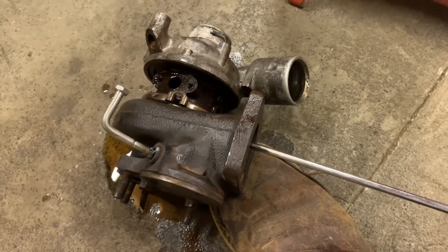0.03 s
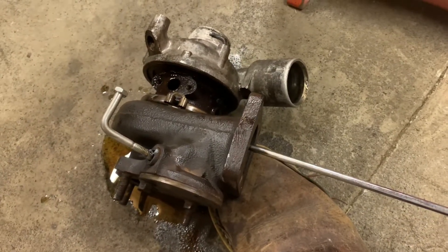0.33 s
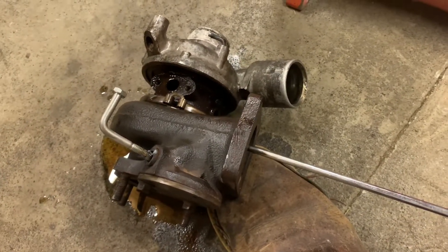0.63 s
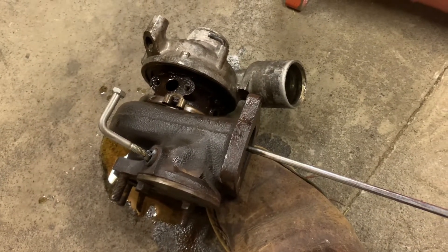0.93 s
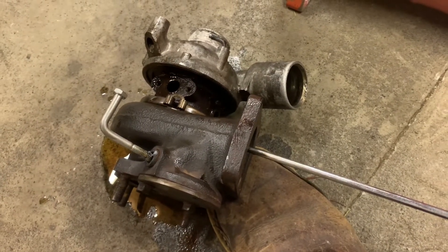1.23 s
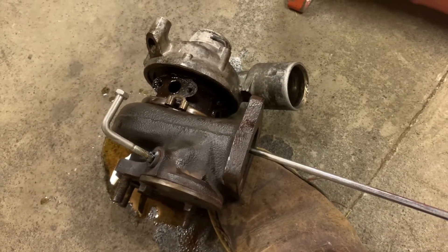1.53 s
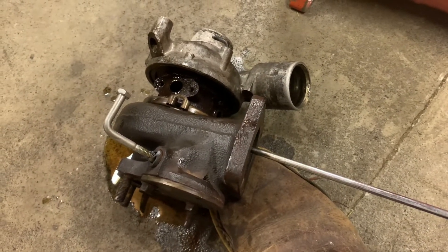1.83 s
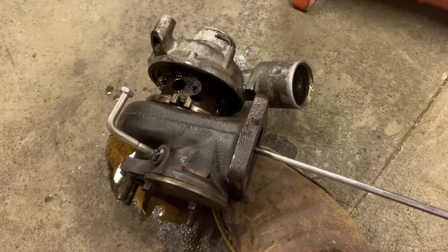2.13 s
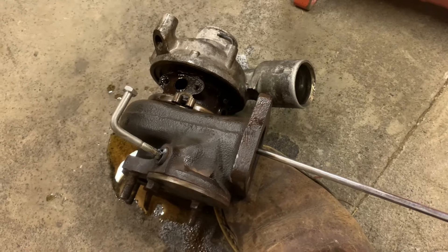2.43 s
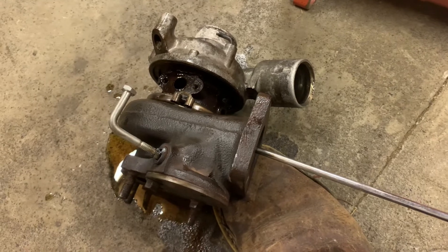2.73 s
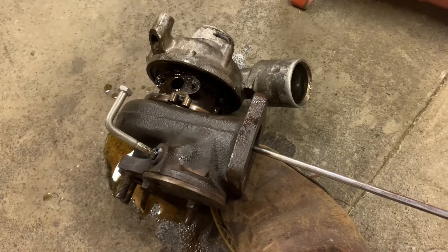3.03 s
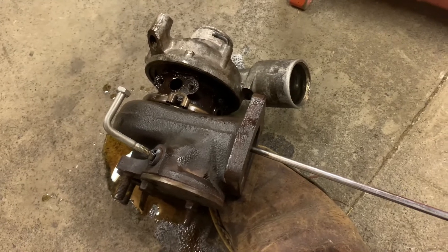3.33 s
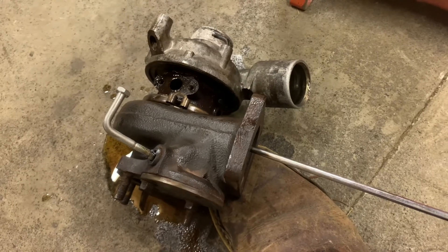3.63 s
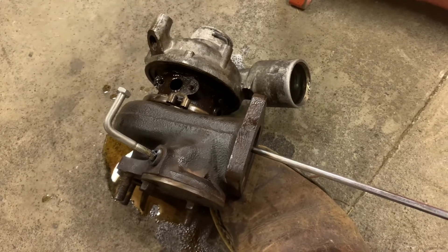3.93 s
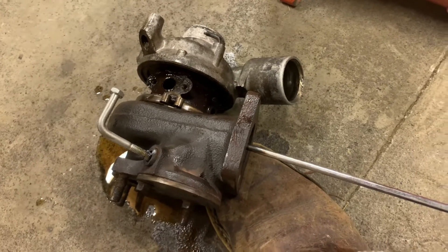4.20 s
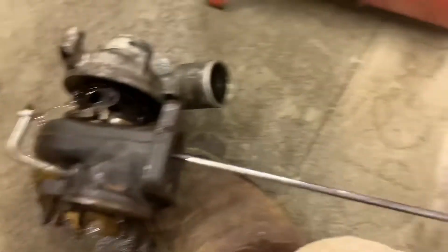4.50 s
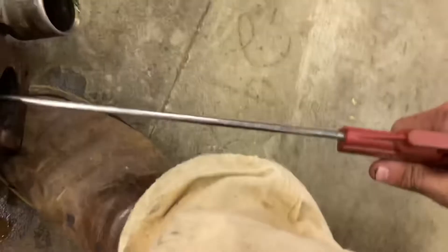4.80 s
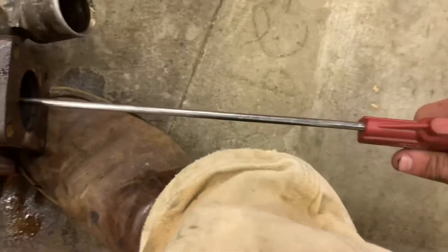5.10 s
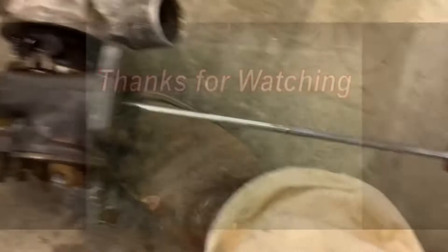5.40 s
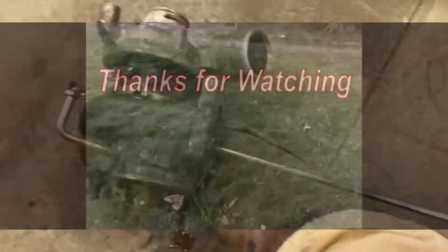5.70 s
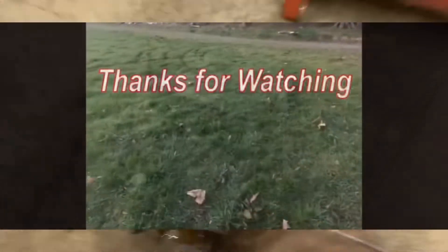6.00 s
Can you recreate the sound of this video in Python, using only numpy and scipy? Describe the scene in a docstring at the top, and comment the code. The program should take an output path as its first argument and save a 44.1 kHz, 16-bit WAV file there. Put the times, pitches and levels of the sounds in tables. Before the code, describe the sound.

A turbocharger whines upward under four hissing blasts from a blow gun, before the workshop gives way to a small puttering engine.

```python
"""A loose turbocharger on a workshop floor whistles as a blow gun spins it up in four blasts.
Its blades chop the jet like a siren; the rising tone swells and dips through the peaks of housing and
room together. Between blasts the wheel coasts. Turbulence hisses at the nozzle and an air pump thumps.
The listener steps closer before the last blast. At the end the workshop fades, and a small
two-cylinder engine, running outdoors, fades in, its firing pulses ringing a silencer."""
import sys
import numpy as np
from scipy import signal
from scipy.fft import rfft, irfft, next_fast_len
from scipy.io import wavfile
from scipy.ndimage import uniform_filter1d

SR = 44100
rng = np.random.default_rng(int(sys.argv[2]) if len(sys.argv) > 2 else 0)


def int16_out(signal):
    """Quantize to a 16-bit WAV file."""
    q = np.round(np.clip(np.atleast_2d(signal).T, -1, 1) * 32767)
    wavfile.write(sys.argv[1], SR, q.astype(np.int16))


N = 271215
TIME = np.arange(N) / SR
SIZE = next_fast_len(N + 2 * SR)
FREQ = np.arange(SIZE // 2 + 1) * SR / SIZE
BLADES = 12

# Blow-gun blasts: opens t/s, closes t/s, opening time/s, spin-up/(Hz/s), time to zero thrust/s,
# hiss level/dB, pressure droop/(dB/s), rush level/dB, whistle level/dB, whistle's valve exponent
AIR_BLASTS = [(-.05, 1.968, .02, 971.4, 2.5, -23, -1.5, -39.7, 0, 1.2),
              (2.712, 3.737, 0.027, 2191, 1.884, -22.9, -1, -39.6, 0.3, 0.99),
              (3.927, 4.201, .05, 1800, 1.69, -25, -0.5, -41.8, -2, 3.2),
              (4.769, 4.964, .08, 636, 2.2, -26.2, -4, -48, -0.3, 1.5)]
# Modes of the air in the scroll: f/Hz, bandwidth/Hz, level/dB
SCROLL_MODES = [(598.8, 17.6, 2), (648, 45, -6.5), (1009, 58, -3.5), (1182, 66, -7.5), (1425, 36, -9),
                (1635, 170, -7)]


def whistle(blade_hz, tone, rush, floor_db=-48, flutter_db=1.35, jitter_rad=.051, wobble=.023):
    """Siren principle: blades chop the jet; each harmonic sweeps the peaks of housing and room."""
    # Peaks of housing and room together, where the whistle swells: f/Hz, bandwidth/Hz, level/dB
    response_peaks = [(1437, 117, -22), (1609, 86, -25.5), (1900, 130, -23.5), (2152, 275, -20.5),
                      (2697, 144, -23), (2847, 105, -16.5), (3030, 76, -22.5), (3205, 121, -19.6),
                      (3291, 26, -18), (3400, 130, -32.5), (3484, 27, -27.5), (3556, 16, -34),
                      (3773, 230, -26.5), (3990, 240, -29.1), (4510, 550, -25.5), (4940, 157, -36.5),
                      (5280, 87, -36.5), (5810, 370, -34), (6046, 99, -37), (6333, 210, -31.1),
                      (6640, 300, -33.5), (6796, 130, -34.0), (7100, 173, -41.5), (7610, 560, -36),
                      (9490, 330, -41.5), (9900, 180, -39.5), (10250, 181, -41), (10660, 140, -44),
                      (10920, 806, -34.5), (13974, 668, -53), (15000, 457, -39), (15660, 280, -30.1)]
    # Overtones against blade rate: f/Hz, level/dB, slope/(dB/octave)
    overtones = [(1470, -19.5, 4), (1964, 6, -7), (2660, 8.5, -6)]
    rates, *columns = np.transpose(overtones)
    overtone_db, octave_db = (np.interp(blade_hz, rates, c) for c in columns)
    phase = 2 * np.pi * np.cumsum(blade_hz * (1 + .00027 * walk(30.05))) / SR + jitter_rad * walk(250)
    harmonics = 0
    for k in range(1, 7):
        peaks = (undb(db) / (1 + (2 * (k * blade_hz - hz) / width) ** 2)
                 for hz, width, db in response_peaks)
        power = undb(floor_db) ** 2 + sum(peak ** 2 for peak in peaks)
        harmonic_db = 0 if k == 1 else overtone_db + octave_db * np.log2(k / 2)
        turbulence_db = flutter_db * k ** .75 * walk(45)
        harmonics += tone * np.sqrt(2 * power) * undb(harmonic_db + turbulence_db) * np.sin(k * phase)
    # unequal blades modulate the amplitude twice a shaft turn
    harmonics *= 1 + wobble * np.cos(2 * phase / BLADES)
    return harmonics + shaft_tones(phase, blade_hz, rush)


def shaft_tones(phase, blade_hz, rush, bypass_db=-3, flutter_db=3):
    """Rotor asymmetry: unequal blades sound multiples of the shaft rate, filtered by the scroll."""
    # Shaft harmonics: multiple of the shaft rate, level/dB
    shaft_orders = [(2, -22), (3, -8.5), (4, -17.5), (5, -11.5), (7, -15.5), (9, -12)]
    # Their gain against blade rate, greatest at middling speeds: f/Hz, level/dB
    speed_gain = [(1450, -11), (2200, -0.5), (2500, 2.5), (3000, 1), (3450, -4)]
    speed_db = np.interp(blade_hz, *np.transpose(speed_gain))
    tones = sum(undb(db + speed_db + flutter_db * walk(24.99)) * np.sin(order * phase / BLADES)
                for order, db in shaft_orders)
    return through(np.sqrt(2) * rush * tones, undb(bypass_db) + resonances(SCROLL_MODES))


def blade_rate(opening, age, start_hz=2452, coast_s=.904):
    """Inertia: each blast raises the pitch ever more slowly; between blasts the wheel coasts down."""
    spin_up, thrust_s = np.transpose(AIR_BLASTS)[3:5, :, None]
    thrust = opening ** 2
    push = np.sum(thrust * spin_up * (1 - age / thrust_s), axis=0)
    run_down = np.exp(-np.cumsum(1 - thrust.sum(axis=0)) / (coast_s * SR))
    return run_down * (start_hz + np.cumsum(push / run_down) / SR)


def catch(opening, age, sharp_hz=75, settle_s=.01597):
    """Onset transient: as the jet hits, the whistle starts sharp and settles exponentially."""
    return sharp_hz * np.sum((opening > 0) * np.exp(-age / settle_s), axis=0)


def valve(closing_s=.024):
    """Throttling: for each blast, how far the valve is open and the seconds it has been held."""
    start, end, rise = np.transpose(AIR_BLASTS)[:3, :, None]
    opening = np.clip((TIME - start) / rise, 0, 1) * np.clip((end - TIME) / closing_s + .5, 0, 1)
    return opening, np.clip(TIME - start, 0, end - start)


def blast_gains(opening, age):
    """Source strength follows hose pressure: the gains of hiss, rush and whistle sag together."""
    hiss_db, droop, rush_db, tone_db, exponent = np.transpose(AIR_BLASTS)[5:, :, None]
    pressure = undb(droop * age)
    gains = opening * undb(hiss_db), opening * undb(rush_db), opening ** exponent * undb(tone_db)
    return [np.sum(pressure * gain, axis=0) for gain in gains]


def jet(hiss, rush, surge_db=.5, flutter_db=.8, buffet_db=-23):
    """Broadband excitation: turbulence hisses, rings the scroll and buffets the air around it."""
    surge = undb(surge_db * walk(12) + flutter_db * walk(200))
    response = resonances(SCROLL_MODES) * colour([(140, -10), (260, 2.5), (480, -1.5), (580, -2)])
    scroll = rush * noise(response) * undb(2.3 * walk(20))
    buffet = rush * undb(buffet_db) * noise(resonances([(65, 29, 0)]))
    return surge * (nozzle(hiss) + scroll) + buffet


def nozzle(hiss):
    """Directivity: the hiss changes colour as the listener comes round to the inlet."""
    # Hiss spectrum past the housing: f/Hz, level/dB
    side_spectrum = [(150, -26), (400, -23), (700, -14), (1300, -16), (1650, -14), (1900, -18), (2150, -12),
                     (2500, -17), (2900, -12), (3300, -6), (3600, -6), (3950, 2.5), (4200, -.5), (4450, 1),
                     (4900, -6), (5300, -4.5), (5500, -6.5), (6300, -3.5), (9000, -5.5), (10700, -.5),
                     (11600, -5.5), (13000, -8.5), (14700, 1), (15600, 1.5)]
    # Hiss spectrum in front of the inlet: f/Hz, level/dB
    inlet_spectrum = [(150, -20.5), (700, -19), (1500, -7), (2100, -11), (2900, -12), (3400, -22),
                      (4300, 3.5), (5000, -19), (5750, 5), (6500, -4.5), (7250, 0.5), (8000, -3.5),
                      (10000, -0.5), (12000, -0.5), (13700, -5), (15600, 0)]
    near = listener_step()
    side = np.sqrt(1 - near) * noise(colour(side_spectrum))
    inlet = np.sqrt(near) * noise(colour(inlet_spectrum))
    return hiss * (side + inlet)


def wheel(blade_hz, whirr_db=-44, speed_exponent=1.87, swish_db=-66, smear_hz=280):
    """Rotor noise: the whirr grows as a power of speed; a narrow-band swish emerges as it slows."""
    # Whirr spectrum: f/Hz, level/dB
    whirr_spectrum = [(300, -18.5), (800, -8), (1020, 1.5), (1250, -3), (1470, 2), (1700, 0), (2100, 3.5),
                      (2450, -11), (3000, -12), (4200, -6.5), (7000, -13), (9000, -17), (15500, -31)]
    phase = 2 * np.pi * np.cumsum(blade_hz) / SR
    swish = walk(smear_hz) * np.sin(phase) + walk(smear_hz) * np.cos(phase)
    slow = (blade_hz.min() / blade_hz) ** 2
    fast = (blade_hz / blade_hz.max()) ** speed_exponent
    whirr = fast * undb(whirr_db + walk(24.93)) * noise(colour(whirr_spectrum))
    dying_away = np.interp(TIME, [5, 5.3], [1, .1])
    return (whirr + undb(swish_db) * slow * swish) * dying_away


def hum(far_db=-64, near_db=-51.5, swell_s=4.44, swell_width_s=.2):
    """Cavity resonance: the wheel stirs the housing, loudest as the listener passes its mouth."""
    # Modes of the hollow housing: f/Hz, bandwidth/Hz, level/dB
    cavity_modes = [(1422, 31, -1.5), (1700, 120, -8.5)]
    passing = np.exp(-((TIME - swell_s) / swell_width_s) ** 2)
    response = resonances(cavity_modes) * colour([(900, -18), (1350, 1.5), (1800, -2), (2600, -23)])
    return (undb(far_db) * (1 - listener_step()) + undb(near_db) * passing) * noise(response)


def engine(cycle_hz=28.79, second_lag=.3626, second_db=-2, clatter_db=-17, rumble_db=-9):
    """Pulse excitation: two unevenly spaced firings a cycle ring the silencer; valve gear clatters."""
    # Silencer modes: f/Hz, bandwidth/Hz, level/dB
    silencer_modes = [(62, 20, 0), (115, 20, 2), (147, 37, 6), (246, 28, -3), (288, 20, -13)]
    # Spectrum of the outflowing gas: f/Hz, level/dB
    rumble_spectrum = [(20, -8), (35, -2), (75, -6), (120, 2), (180, -1), (220, -8.5), (320, -7),
                       (400, -14), (700, -22), (3000, -66)]
    # Spectrum of the valve gear: f/Hz, level/dB
    clatter_spectrum = [(30, -15.5), (200, -19), (400, -8), (600, 0.5), (780, -9), (1400, 0), (2150, -9.5),
                        (2400, -6.5), (2650, -6), (3250, -3.5), (4300, -14), (5300, -15.5), (5900, -16.5),
                        (6900, -10), (9200, -22.5), (10700, -24.5), (12000, -37), (15500, -38)]
    cycles = np.cumsum(cycle_hz * (1 + .004 * walk(8))) / SR + .004 * walk(60)
    firings = strokes(cycles, scatter_db=1)
    firings += undb(second_db) * strokes(cycles - second_lag, scatter_db=-.5)
    lowpass = 1 / (1 + 1j * FREQ / 380) ** 3
    silencer = resonances(silencer_modes) * lowpass * colour([(285, 2.5), (320, -7), (420, -12)])
    exhaust = unit(through(firings, silencer)) + undb(rumble_db) * noise(colour(rumble_spectrum))
    clatter = noise(colour(clatter_spectrum)) * (1 + .19 * np.cos(4 * np.pi * cycles))
    return exhaust + undb(clatter_db) * clatter


def engine_fade(start_s=5.18, full_s=6.308, entry_s=.042):
    """Square-law fade: the engine enters softly and its amplitude grows quadratically."""
    entry = np.clip((TIME - start_s) / entry_s, 0, 1)
    return entry * np.interp(TIME, [start_s, full_s], [.14, 1]) ** 2


def pump(stroke_hz=19.93, thump_db=-54, air_db=-60):
    """Forced vibration: even strokes ring the air pump's body, over the workshop's ambient noise."""
    # Body modes: f/Hz, bandwidth/Hz, level/dB, lag in the stroke t/s
    body_modes = [(73.8, 7.2, 4.5, 0.0016), (112.2, 5.7, 4, 0.0029), (264, 43, -12.5, .02),
                  (330, 102, -5, .032), (437.5, 16.5, 4.5, .008), (500, 21, 2, .018), (564, 32, 2, .003)]
    # Spectrum of the still workshop air: f/Hz, level/dB
    air_spectrum = [(28, -48), (70, -25.5), (180, -14), (300, 4.5), (500, -1), (900, -10), (1600, -9),
                    (2400, -40), (5000, -37), (15500, -21)]
    beat = strokes(stroke_hz * TIME + .6, scatter_db=1.2)
    body = sum(resonances([mode]) * np.exp(-2j * np.pi * FREQ * lag) for *mode, lag in body_modes)
    muffling = colour([(30, -15), (70, 0), (580, 0), (800, -14), (4000, -70)])
    thumps = unit(through(beat, body * muffling))
    return undb(thump_db) * thumps + undb(air_db) * noise(colour(air_spectrum))


def scattered(hiss, scatter_db=-12):
    """Diffuse scattering: hiss thrown off the casting and floor reaches each side uncorrelated."""
    return undb(scatter_db) * np.array([nozzle(hiss), nozzle(hiss)])


def workshop(x, early_db, wet_db=-14.5, treble_db=-6, t60_s=(.62, .41, .05)):
    """Reverberation: quick floor reflections, then a diffuse tail, shorter and weaker in the treble."""
    tails = [rng.standard_normal((2, N)) * undb(-60 * TIME / t60) * (TIME > .003) for t60 in t60_s]
    bass, treble, early = (rfft(tail / np.sqrt(np.sum(tail[0] ** 2)), SIZE) for tail in tails)
    crossover = 1 / (1 + (FREQ / 5500) ** 4)
    diffuse = crossover * bass + (1 - crossover) * undb(treble_db) * treble
    return through(x, undb(wet_db) * diffuse + undb(early_db) * early)


def stereo(x, shade_db=-4):
    """Phase and level differences give direction; the listener's step shifts them and dulls the top."""
    # Differences between the sides: f/Hz, left phase lead/rad, left minus right level/dB
    side_differences = [(100, -0.7, -4), (430, -3.6, -3), (1050, -4.4, 0), (1450, -3.8, -1),
                        (1700, -4.4, -3), (2060, -2.0, -4), (2400, -4.8, -2), (2730, -4.6, -5),
                        (2820, -3.4, -5), (3050, -3.6, 0), (3400, -4.2, -1), (4200, -4.4, 0),
                        (5300, -3.1, 0), (8300, 0, 0), (15800, 6.2, 0)]
    # What the step adds: f/Hz, left phase lead/rad, left minus right level/dB
    step_shift = [(400, -0.036, -0.5), (1480, -1.52, 2), (3000, 1.86, 1.5), (4180, 0.12, -0.5)]
    hz, *columns = np.transpose(side_differences)
    lead, balance_db = (np.interp(FREQ, hz, c) for c in columns)
    hz, *columns = np.transpose(step_shift)
    turn, lean_db = (np.interp(FREQ, hz, c) for c in columns)
    sides = np.array([[.5], [-.5]])
    balance = undb(sides * balance_db)
    before = balance / np.sqrt(np.mean(balance ** 2, axis=0)) * np.exp(1j * sides * lead)
    shade = colour([(10000, .0025), (13000, shade_db)])
    # the turn adds to the lead, while the lean alone sets the balance after the step
    after = shade * undb(sides * lean_db) * np.exp(1j * sides * (lead + turn))
    moved = listener_step()
    return (1 - moved) * through(x, before) + moved * through(x, after)


def listener_step(middle_s=4.5, length_s=.36):
    """Uniform motion: how far the listener has come towards the inlet, 0 to 1."""
    return np.clip((TIME - middle_s) / length_s + .5, 0, 1)


def undb(db):
    """Amplitude ratio of a level in decibels."""
    return 10 ** (np.asarray(db) / 20)


def unit(x):
    """Normalisation to rms 1."""
    return x / np.sqrt(np.mean(x ** 2))


def through(x, response):
    """Convolution, as a product of spectra."""
    return irfft(rfft(x, SIZE) * response, SIZE)[..., :N]


def colour(points):
    """Spectral envelope through (f/Hz, level/dB) points on a logarithmic frequency axis."""
    hz, db = np.transpose(points)
    return undb(np.interp(np.log(FREQ + 1), np.log(hz), db))


def resonances(modes):
    """Superposition of damped modes (f/Hz, bandwidth/Hz, level/dB)."""
    return sum(undb(db) * 1j * FREQ * width / (hz ** 2 - FREQ ** 2 + 1j * FREQ * width)
               for hz, width, db in modes)


def noise(response):
    """Filtered Gaussian noise of rms 1."""
    return unit(through(rng.standard_normal(N), response))


def walk(rate_hz):
    """Slow random modulation of rms 1: held values, smoothed twice."""
    hold = max(int(SR / rate_hz), 1)
    steps = np.repeat(rng.standard_normal(N // hold + 1), hold)
    return unit(uniform_filter1d(uniform_filter1d(steps, hold), hold)[:N])


def strokes(cycles, scatter_db):
    """Impulse train: one slightly uneven pulse for each whole cycle."""
    pulses = np.diff(np.floor(cycles), prepend=np.floor(cycles[0]))
    return pulses * undb(scatter_db * rng.standard_normal(N))


def scene(whistle_room_db=2, closer_db=4, engine_db=-22.5):
    """Superposition of direct, scattered and reverberant sound, giving way to the engine outdoors."""
    opening, age = valve()
    blade_hz = blade_rate(opening, age)
    hiss, rush, tone = blast_gains(opening, age)
    whine = whistle(blade_hz + catch(opening, age), tone, rush)
    air = jet(hiss, rush) + wheel(blade_hz) + hum()
    # the whistle beams into the room, and sounds drier from close by
    direct = stereo(undb(closer_db * listener_step()) * whine + air + pump())
    room = workshop(air, early_db=-18)
    room += undb(whistle_room_db) * workshop(whine, early_db=-20, treble_db=-9)
    fade = np.interp(TIME, [5.2, 6.15], [1, .1])
    return fade * (direct + scattered(hiss) + room) + undb(engine_db) * engine_fade() * engine()


def record(dry, top_hz=15720):
    """Band limiting: an elliptic low-pass cuts the top steeply."""
    return signal.sosfilt(signal.ellip(12, .1, 80, top_hz, fs=SR, output="sos"), dry)


dry = scene()
out = record(dry)
int16_out(out)
```